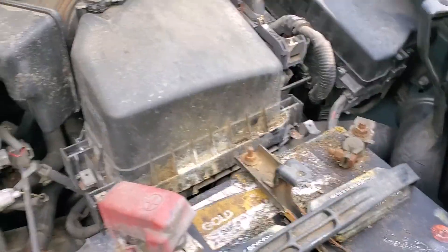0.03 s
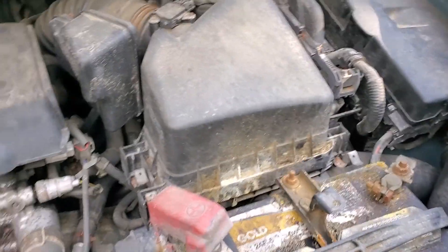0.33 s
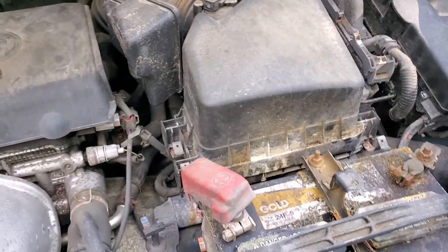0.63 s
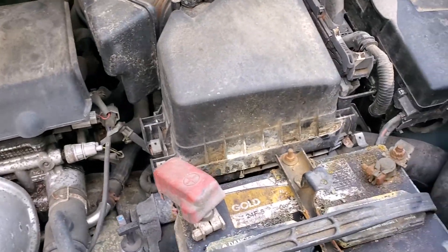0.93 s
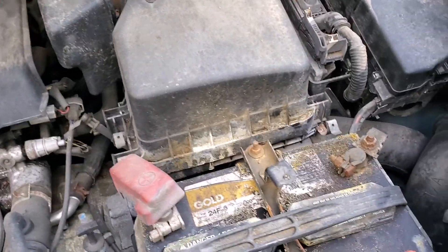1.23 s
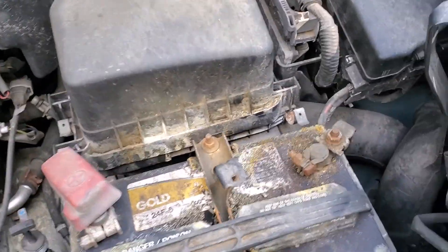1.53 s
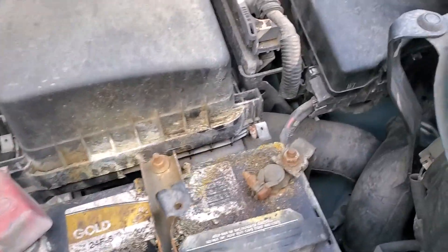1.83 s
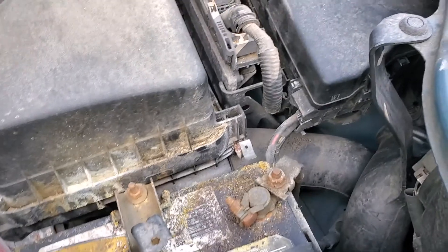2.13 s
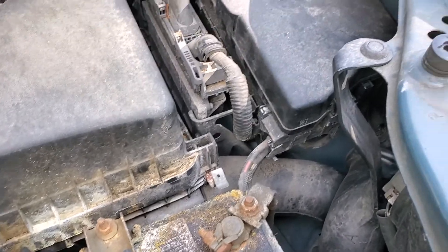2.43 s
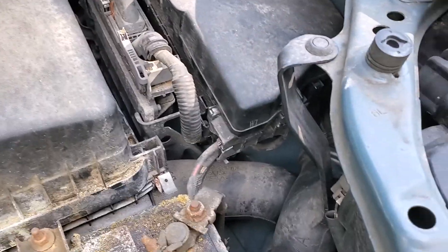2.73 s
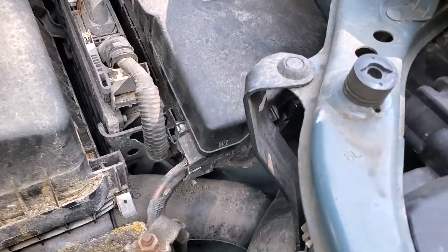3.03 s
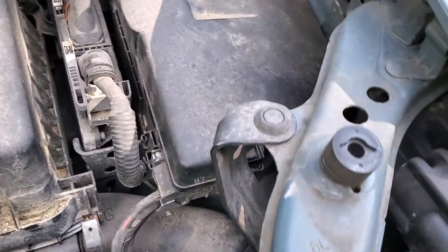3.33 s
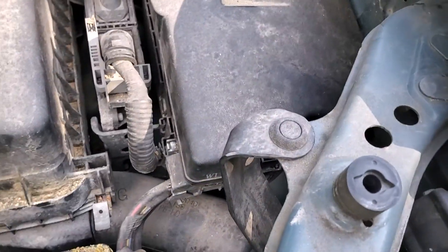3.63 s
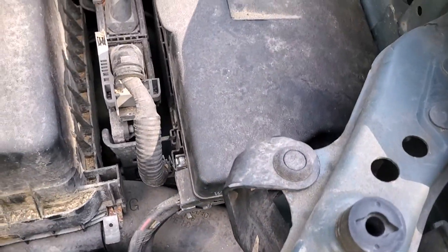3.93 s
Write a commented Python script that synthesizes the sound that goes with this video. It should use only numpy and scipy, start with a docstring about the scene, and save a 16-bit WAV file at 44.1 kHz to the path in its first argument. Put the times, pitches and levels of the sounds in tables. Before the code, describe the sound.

A car engine idles with rapid, even ticking over a low rumble and faint whirr. The microphone moves close over the open engine bay, picking up two light handling clicks and, from halfway, low buffeting gusts of wind.

```python
"""A car engine idles under an open bonnet. From the start a solenoid valve, probably the purge valve,
ticks fifteen times a second: it clicks open, clicks shut, and each stroke knocks in its hose. The
microphone pans across the bay with soft swishes, and a light handling click comes at 0.7 s. From two
seconds on, gusts of air buffet its two ports. Near three seconds a finger scrapes the casing and a
second click follows; then the gusts reach their peak and ease."""
import sys
import numpy as np
from scipy import signal
from scipy.fft import rfft, irfft
from scipy.io import wavfile
from scipy.ndimage import uniform_filter1d

SR = 44100
rng = np.random.default_rng(int(sys.argv[2]) if len(sys.argv) > 2 else 0)


def to_wav(sig):
    """Store sig (one row per channel, or 1-D mono) as 16-bit WAV at the path in sys.argv[1].

    Samples outside -1..1 are clipped; the rate is SR.
    """
    pcm = np.clip(np.atleast_2d(sig), -1, 1) * 32767
    pcm = np.round(pcm).astype(np.int16)
    wavfile.write(sys.argv[1], SR, pcm.T)  # frames by channels


N = 176400
T = np.arange(N) / SR

# openings of the valve: start_s
OPENINGS = [.048, .105, .174, .234, .305, .363, .435, .501, .571, 0.635, .698, .764, .82, 0.893, 0.95,
            1.019, 1.085, 1.155, 1.22, 1.287, 1.355, 1.422, 1.494, 1.556, 1.616, 1.691, 1.752, 1.823, 1.883,
            1.954, 2.016, 2.079, 2.146, 2.215, 2.283, 2.347, 2.41, 2.472, 2.548, 2.61, 2.672, 2.734, 2.797,
            2.868, 2.933, 3.005, 3.063, 3.127, 3.187, 3.253, 3.311, 3.381, 3.444, 3.512, 3.579, 3.644,
            3.713, 3.778, 3.845, 3.912, 3.978]
# the valve from the moving microphone: time_s, upper_knock_db, click_db, treble_db, pan_db
VALVE_VIEW = [(.15, 0, -1.5, -1, 0), (1.1, -3.5, -1.5, -4, 3), (2.1, -1, 2, -1.5, 7), (2.8, 0.5, 4.5, 1, 9),
              (3.7, 0.5, 1.5, 3, 9.5)]
# opening and shutting stroke: delay_s, rattle_db, treble_db, ring_db, attack_s, hold_s
STROKES = [(0, -58.5, -3.5, -6.5, 0.0019, 0.009), (.0095, -59, 3, -0.5, 0.0026, 0.001)]
# modes of the valve body: pitch_hz, level_db, t60_s
BODY_MODES = [(2002, -67, 0.09), (2968, -66.5, 0.11), (3398, -60, 0.06), (3656, -66.5, 0.045),
              (6335, -67, 0.016)]

def valve_clicks():
    """Impact excitation: each stroke gives a rattle of reflections and rings the valve body's modes."""
    t, out = T[:SR // 8], 0
    _, click_db, treble_db, pan_db = in_time(VALVE_VIEW)
    crossover = signal.butter(2, 7600, fs=SR, output="sos")
    for delay, rattle_db, bright_db, ring_db, attack, hold in STROKES:
        times = np.array(OPENINGS) + delay
        force = from_db(rng.normal(0, 1.38, len(times)))
        click = from_db(rattle_db) * rattle(times, force, burst(t, attack, hold, t60=0.056))
        for hz, mode_db, t60 in BODY_MODES:
            for channel in click:
                phase = 2 * np.pi * (hz * t + rng.random((len(times), 1)))
                gains = force * from_db(mode_db + ring_db + rng.normal(0, 3.2, len(times)))
                channel += repeated(times, gains, np.sin(phase) * burst(t, attack, 0, t60))
        low = signal.sosfiltfilt(crossover, click)
        out += low * placed(click_db, pan_db)
        out += (click - low) * placed(treble_db + bright_db, pan_db - 7.5)
    return out

# spectrum of the clicks: frequency_hz, density_db
CLICK_SPECTRUM = [(1100, 3.5), (2450, -5.5), (3400, 5.5), (4200, 0), (6400, -2.5), (7500, -11.5),
                  (11500, 0), (13500, -3), (15500, -11.5)]

def rattle(times, force, envelope, shared_power=0.65, turns_per_s=0.4):
    """Multipath reflection: part of the pattern turns slowly as the microphone moves, part is new."""
    hiss, size = noise(CLICK_SPECTRUM), len(envelope)
    turn = 2 * np.pi * turns_per_s * times[:, None]
    patterns = [np.cos(turn) * channel[:size] + np.sin(turn) * channel[-size:] for channel in hiss]
    shared = np.array([repeated(times, force, envelope * pattern) for pattern in patterns])
    fresh = repeated(times, force, envelope) * hiss
    return np.sqrt(shared_power) * shared + np.sqrt(1 - shared_power) * fresh

# resonances of the hose, timed from each opening: pitch_hz, level_db, delay_s, swell_s
HOSE_MODES = [(856, -45, .0032, 0.003), (870, -44.5, .0105, 0.003), (588.5, -52.5, 0.0096, 0.011),
              (640, -55.5, -.001, 0.0018), (424.7, -56, .006, 0.0081), (770, -55, 0.025, 0.0028),
              (699.6, -53.5, .006, 0.0069)]
# shift of the upper resonances at the moving microphone: time_s, pitch_ratio
UPPER_KNOCK_PITCH = [(0, 1.004), (.9, 0.971), (3.3, 1.055)]
# strength of the lower resonances at the moving microphone: time_s, gain_db
LOWER_KNOCK_GAIN = [(.2, -5), (1.3, 1.5)]

def hose_knock(upper_above_hz=694, right_lag_s=0.0001):
    """Pipe resonance: each stroke sends a pressure pulse down the hose, whose modes swell and die."""
    t, opens, out = T[:SR // 8], np.array(OPENINGS), 0
    upper_ratio = in_time(UPPER_KNOCK_PITCH, opens)[0]
    upper_db = in_time(VALVE_VIEW, opens)[0]
    lower_db = in_time(LOWER_KNOCK_GAIN, opens)[0]
    for hz, db, delay, swell in HOSE_MODES:
        ratio, view_db = (upper_ratio, upper_db) if hz > upper_above_hz else (1, lower_db)
        detune, scatter_db = rng.normal(0, [0.026, 1.85], (len(opens), 2)).T
        pitch = hz * ratio * (1 + detune)
        envelope = (t / swell * np.exp(1 - t / swell)) ** 2
        knocks = envelope * np.sin(2 * np.pi * pitch[:, None] * t)
        out += repeated(opens + delay, from_db(db + view_db + scatter_db), knocks)
    right = np.interp(T - right_lag_s, T, out)
    return np.array([out, right]) * placed(0, pan_db=3)

# gust strength at the left port: time_s, level_db
GUST_LEFT = [(2.1, -50.5), (2.55, -39), (2.76, -33), (2.87, -41.5), (3.12, -34.5), (3.24, -20.5),
             (3.29, -28), (3.37, -15), (3.48, -27.5), (3.62, -18), (3.88, -28), (3.99, -41.5)]
# gust strength at the right port: time_s, level_db
GUST_RIGHT = [(2.11, -55), (2.16, -21.5), (2.25, -22), (2.31, -31), (2.66, -50), (2.69, -24.5), (2.81, -37),
              (2.9, -27.5), (3.12, -34.5), (3.27, -21.5), (3.41, -37), (3.99, -44.5)]
# spectrum of the large eddies: frequency_hz, density_db
BUFFET_SPECTRUM = [(40, -5.5), (75, 3), (125, -6), (300, -33.5), (800, -47)]
# spectrum of the small eddies: frequency_hz, density_db
EDDY_SPECTRUM = [(100, -4), (180, 12.5), (800, -28)]

def wind(eddy_growth=1.34):
    """Turbulence: pressure fluctuates independently at each port; strong gusts add smaller eddies."""
    flutter_db = 1.6 * np.array([drift(rate_hz=25) for port in "LR"])
    gust_db = np.array(in_time(GUST_LEFT) + in_time(GUST_RIGHT)) + flutter_db
    buffet = noise(BUFFET_SPECTRUM)
    buffet /= np.sqrt(uniform_filter1d(buffet ** 2, size=1800) + 1e-9)  # the gusts alone set its level
    return buffet * from_db(gust_db - 0.5) + noise(EDDY_SPECTRUM) * from_db(eddy_growth * gust_db - 6.5)

# single eddies at the ports: centre_s, level_db, pitch_hz, pan_db
THUMPS = [(2.04, -32.5, 63, -16.5), (2.152, -31, 236, -20), (2.366, -26.5, 131, -20.5),
          (2.605, -23.5, 100.5, 3), (2.852, -26, 99, -16), (3.247, -21, 157, 12), (3.355, -27.5, 192, 22),
          (3.375, -22, 75, 25), (3.395, -29, 312, 24)]

def thumps():
    """Vortex convection: an eddy passing a port pushes and pulls once or twice."""
    out = 0
    for centre, db, hz, pan_db in THUMPS:
        cycles = hz * (T - centre)
        envelope = np.exp(-2 * np.minimum(np.abs(cycles), 10) ** 2)
        out += placed(db, pan_db) * envelope * np.sin(2 * np.pi * (cycles + rng.random()))
    return out

# harmonics of the firing rate: harmonic_number, level_db
HUM_HARMONICS = [(3, -57), (5, -54)]
# rise and fall of the hum: time_s, gain_db
HUM_GAIN = [(.1, -8.5), (.8, 3.5), (1.35, -4.5), (1.8, 0.5)]
# spectrum of the rumble: frequency_hz, density_db
RUMBLE_SPECTRUM = [(25, -7), (58, -1), (110, -0.5), (170, -12), (260, -15), (900, -29.5), (1300, -52)]
# spectrum of the belts: frequency_hz, density_db
WHIRR_SPECTRUM = [(350, 11.5), (900, 9), (2200, -4.5), (3300, -4.5), (4400, -8.5), (7400, -17),
                  (10500, -13.5), (16000, -18)]
# strength of the belts: time_s, level_db
WHIRR_LEVEL = [(0, -63), (1.5, -62.5), (2.1, -58), (2.95, -56.5), (4, -58.5)]

def engine(firing_hz=21.56, whine_hz=3990):
    """Periodic excitation: the firings hum and modulate a rumble, under belt whirr and a thin whine."""
    phase = 2 * np.pi * np.cumsum(firing_hz * (1 + 0.0049 * drift(rate_hz=1.65))) / SR
    hum = 0
    for harmonic, db in HUM_HARMONICS:
        gain = from_db(db + 4.5 * drift(rate_hz=1.83))
        hum += gain * np.sin(harmonic * phase + 2 * np.pi * rng.random())
    throb = from_db(0.91 * np.sin(phase))
    rumble = placed(-54.5, pan_db=-3.5) * noise(RUMBLE_SPECTRUM, correlation=1) * throb
    whirr = placed(in_time(WHIRR_LEVEL)[0], pan_db=1.5) * noise(WHIRR_SPECTRUM, correlation=0.026)
    whine_phase = 2 * np.pi * np.cumsum(whine_hz + 6 * drift(rate_hz=15.5)) / SR
    whine = from_db(np.interp(T, [2.8, 3.65], [-87, -76.5])) * np.sin(whine_phase)
    return hum * placed(in_time(HUM_GAIN)[0], pan_db=-2) + rumble + whirr + whine

# taps on the microphone's casing: start_s, level_db
TAPS = [(0.672, -50), (2.993, -54.5)]
# spectrum of their snap: frequency_hz, density_db
SNAP_SPECTRUM = [(2000, -1), (14000, -3)]

def handling_clicks():
    """Free vibration: a light tap gives a broadband snap and leaves two casing modes ringing."""
    hiss, out = noise(SNAP_SPECTRUM), 0
    for start, db in TAPS:
        t = T - start
        snap = hiss * burst(t, attack=0.0011, hold=0, t60=0.058)
        modes = from_db(-2) * np.sin(2 * np.pi * 3130 * t) + from_db(-7) * np.sin(2 * np.pi * 11480 * t)
        ring = modes * burst(t, attack=0.0029, hold=0, t60=0.035)
        out += placed(db, pan_db=-7) * (snap + ring)
    return out

# spectrum of the rubbing finger: frequency_hz, density_db
SCRAPE_SPECTRUM = [(800, 1.5), (2000, -12), (3300, -8.5), (7500, -21), (13000, -16)]

def scrape(centre_s=2.928, half_length_s=0.018):
    """Stick-slip friction: a finger slides briefly on the casing and makes a rough noise."""
    envelope = np.exp(-((T - centre_s) / half_length_s) ** 4)
    roughness_db = 3.6 * drift(rate_hz=110)
    return envelope * from_db(-48 + roughness_db) * noise(SCRAPE_SPECTRUM)

# soft swishes as the microphone moves: centre_s, half_length_s, frequency_hz, level_db
SWISHES = [(0.396, 0.29, 11300, -72), (1.493, 0.33, 4830, -73.5), (2.187, 0.37, 2830, -67.5),
           (2.696, 0.1, 11500, -67.5)]

def swishes(edge_ratio=1.19):
    """Narrowband noise: each hiss swells and fades under a Gaussian envelope."""
    out = 0
    for centre, half_length, hz, db in SWISHES:
        envelope = np.exp(-((T - centre) / half_length) ** 2)
        out += from_db(db) * envelope * noise([(hz / edge_ratio, 0), (hz * edge_ratio, 0)])
    return out

def from_db(db):
    """Logarithmic level: decibels to amplitude."""
    return 10 ** (np.asarray(db) / 20)

def unit_rms(x):
    """Normalisation to an rms of 1."""
    return x / np.sqrt(np.mean(x ** 2) + 1e-20)

def in_time(rows, at=T):
    """Linear interpolation of each column against the first, time."""
    times, *columns = np.transpose(rows)
    return [np.interp(at, times, column) for column in columns]

def placed(db, pan_db):
    """Level panning: left and right gains, with pan_db as left minus right."""
    return from_db(db + np.array([[.5], [-.5]]) * pan_db)

def drift(rate_hz):
    """Random modulation: low-passed noise with a spread of 1."""
    step, settle = 40, 2000
    pole = np.exp(-2 * np.pi * rate_hz * step / SR)
    white = rng.standard_normal(N // step + settle + 2)
    slow = signal.lfilter([1], [1, -2 * pole, pole * pole], white)[settle:]
    return np.interp(np.arange(N) / step, np.arange(len(slow)), unit_rms(slow))

def noise(spectrum, correlation=0):
    """Spectral shaping: stereo noise of rms 1, falling steeply beyond the ends of its spectrum."""
    hz, db = np.transpose(spectrum)
    log_f = np.log(np.fft.rfftfreq(N, 1 / SR) + 1)
    beyond = np.maximum(np.log(hz[0]) - log_f, 0) + np.maximum(log_f - np.log(hz[-1]), 0)
    gain = from_db(np.interp(log_f, np.log(hz), db) - 50 * beyond)
    mid, side = irfft(rfft(rng.standard_normal((2, N))) * gain, N)
    return unit_rms(np.sqrt(1 + correlation) * mid + np.sqrt(1 - correlation) * np.array([side, -side]))

def burst(t, attack, hold, t60):
    """Exponential decay after an attack and a hold, all in seconds."""
    return np.clip(t / attack, 0, 1) ** 2 * from_db(-60 * np.maximum(t - attack - hold, 0) / t60)

def repeated(times, gains, shapes):
    """Pulse train: one short shape, or one per event, added at each time."""
    out = np.zeros(N + SR)
    for time, piece in zip(times, np.asarray(gains)[:, None] * shapes):
        start = max(int(time * SR), 0)
        out[start:start + len(piece)] += piece
    return out[:N]

def scene():
    """Superposition: the pressures of all sources add at the microphone."""
    bay = valve_clicks() + hose_knock() + engine()
    return bay + handling_clicks() + scrape() + swishes() + wind() + thumps()

def record(dry, cutoff_hz=15900):
    """Band limiting: a steep low-pass filter removes the highest treble."""
    return signal.sosfilt(signal.ellip(10, .1, 80, cutoff_hz, fs=SR, output="sos"), dry)

dry = scene()
out = record(dry)
to_wav(out)
```